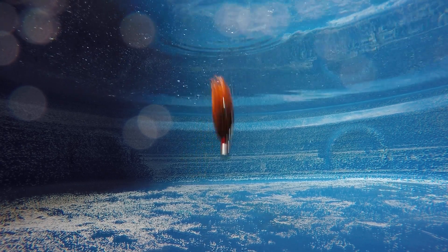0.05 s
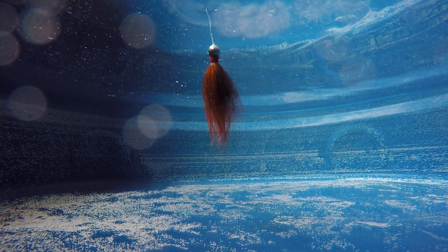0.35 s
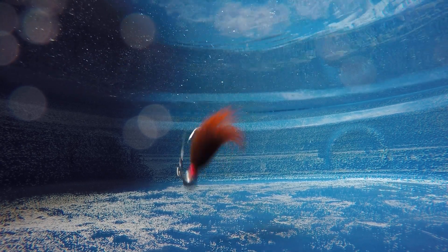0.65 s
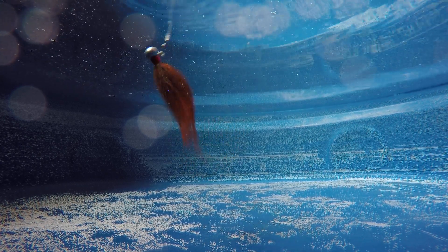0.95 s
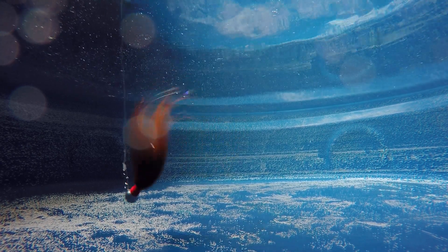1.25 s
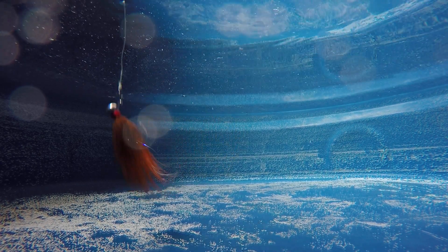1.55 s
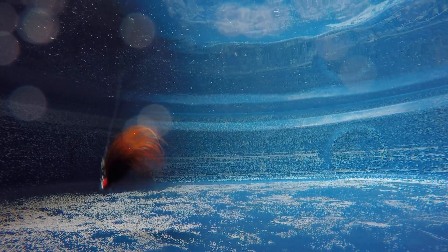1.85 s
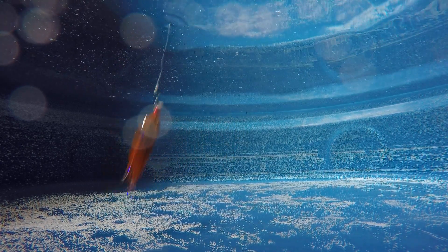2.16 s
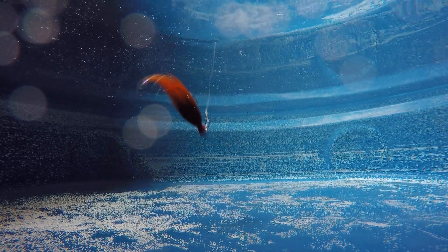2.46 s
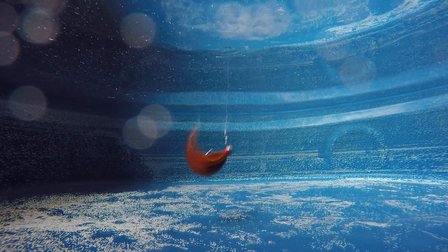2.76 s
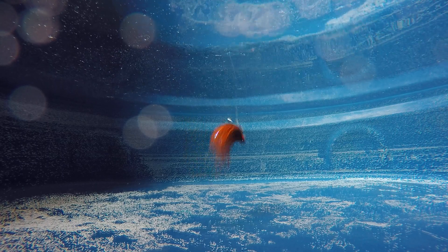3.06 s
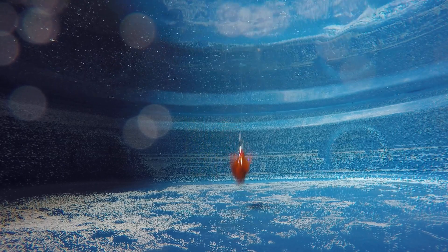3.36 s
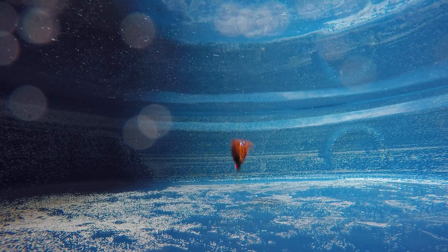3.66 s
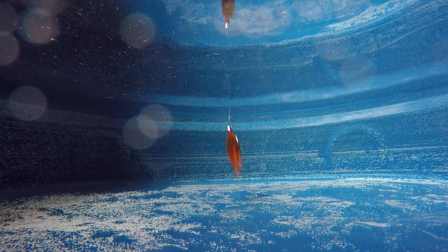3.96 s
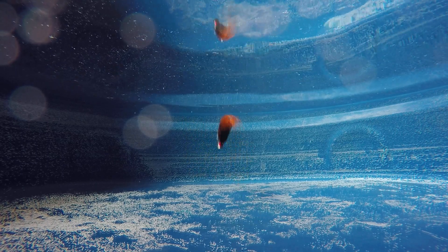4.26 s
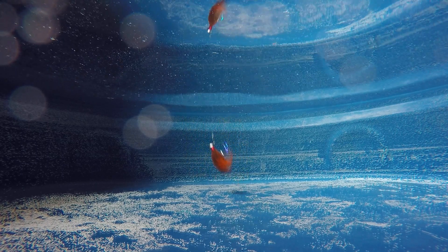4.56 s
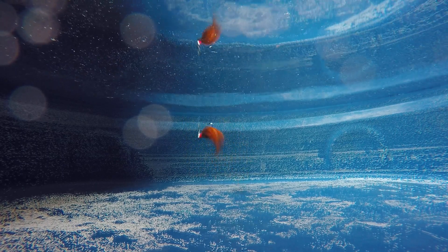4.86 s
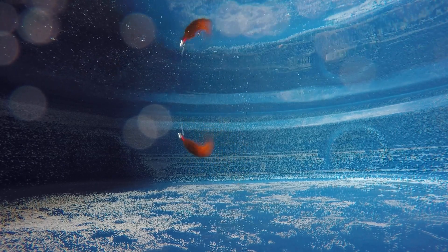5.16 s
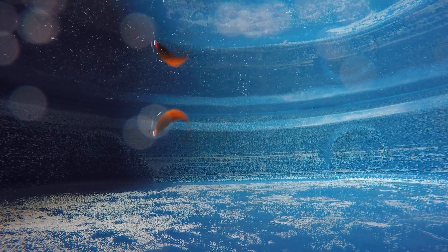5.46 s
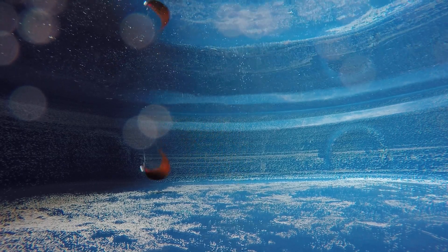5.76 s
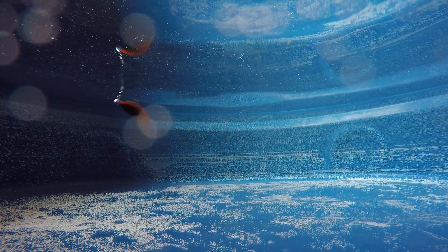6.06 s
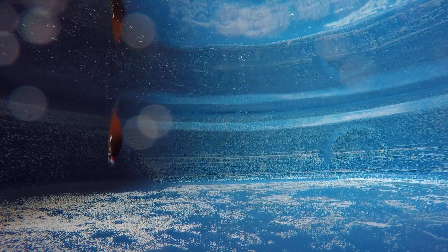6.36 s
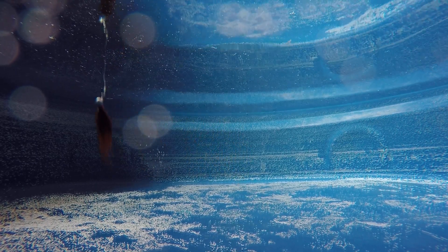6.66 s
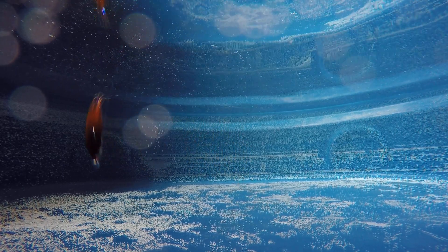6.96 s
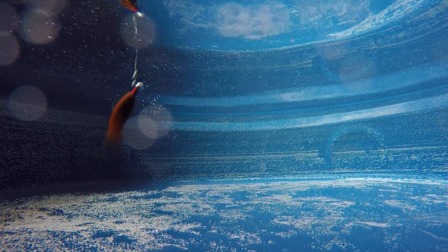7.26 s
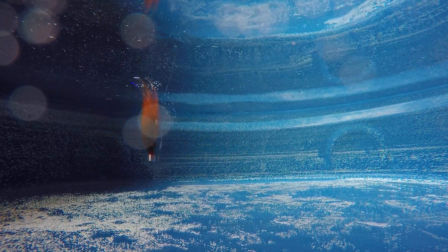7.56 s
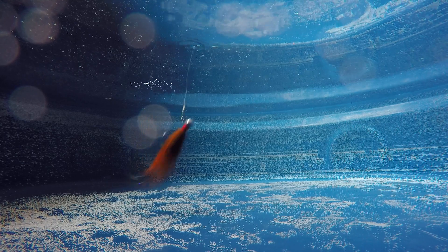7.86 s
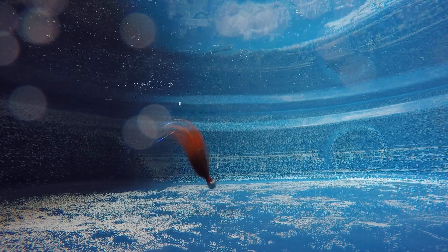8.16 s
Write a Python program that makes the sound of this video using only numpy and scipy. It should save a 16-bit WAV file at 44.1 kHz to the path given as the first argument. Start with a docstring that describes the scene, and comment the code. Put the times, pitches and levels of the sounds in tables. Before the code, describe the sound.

A weighted fishing lure is jigged in a plastic water tank, heard through an underwater camera's case. Its metal head and link give faint, high, irregular ticks. About three seconds in, it hits the floor with a dull knock and a brief low boom, the loudest sound. A small bubble pops just after, and sparse ticking continues to the end over soft hiss, faint motor hum and low water rumble.

```python
"""A weighted fishing lure is jigged in a plastic water tank, heard through an underwater camera's case.
From the start there are microphone hiss, a faint motor hum and a slow rumble of water. At each jerk the
lure's metal head and link tick or scrape, exciting the modes of the case. At 3.3 s the head hits the
floor: dispersive bending waves arrive highs first, then the tank booms and wobbles.
A small bubble pops at 3.9 s, and the ticking goes on to the end."""
import sys
import numpy as np
from scipy import signal
from scipy.fft import rfft, irfft
from scipy.io import wavfile

SR = 44100
rng = np.random.default_rng(int(sys.argv[2]) if len(sys.argv) > 2 else 0)


def to_wav(sig):
    """Store sig (one row per channel, or 1-D mono) as 16-bit WAV at the path in sys.argv[1].

    Samples outside -1..1 are clipped; the rate is SR.
    """
    pcm = np.clip(np.atleast_2d(sig), -1, 1) * 32767
    pcm = np.round(pcm).astype(np.int16)
    wavfile.write(sys.argv[1], SR, pcm.T)  # frames by channels


N = 371322
TIME = np.arange(N) / SR
FREQ = np.maximum(np.fft.rfftfreq(N, 1 / SR), 1)
KNOCK_S = 3.2878


def undb(db):
    """Amplitude ratio of a level in decibels."""
    return 10 ** (np.asarray(db) / 20)


def add(out, start_s, sound):
    """Superposition: a sound adds to the others from its start time."""
    i = int(start_s * SR)
    out[i:i + len(sound)] += sound[:N - i]


def noise(gain):
    """Spectral shaping: white noise is weighted over frequency, then scaled to rms 1."""
    shaped = irfft(rfft(rng.standard_normal(N)) * gain, N)
    return shaped / np.sqrt(np.mean(shaped ** 2) + 1e-30)


def resonance(hz, width_hz):
    """A resonance curve, width_hz wide at half its peak gain."""
    return 1 / (1 + ((FREQ ** 2 - hz ** 2) / (FREQ * width_hz)) ** 2)


def swell_at(middle_s, half_s):
    """A Gaussian envelope, down to 1/e at half_s either side of its peak."""
    return np.exp(-((TIME - middle_s) / half_s) ** 2)


def ring(t, hz, t60):
    """Free vibration of a damped mode, falling 60 dB in t60 seconds."""
    return np.sin(2 * np.pi * hz * t) * np.exp(-np.log(1000) * t / t60)


def mode_responses(t, modes):
    """Impulse responses, one row a mode; neighbouring modes swing in opposite senses."""
    return np.array([(-1) ** k * undb(db) * ring(t, hz, t60) for k, (hz, db, t60) in enumerate(modes)])


def microphone_hiss(hiss_db=-59, whistle_db=-83):
    """Self-noise of the microphone: a steady broad spectrum with a thin high band in it."""
    # spectral shape of the hiss: frequency_hz, gain_db
    spectrum = [(20, -7.5), (45, -5), (75, -10.5), (120, -14), (200, -18), (350, -22.5), (560, -22.5),
                (850, -28), (2000, -30), (5000, -31.5), (8500, -38), (11000, -39), (13000, -38),
                (15000, -40.5)]
    hz, db = np.transpose(spectrum)
    hiss = noise(undb(np.interp(np.log(FREQ), np.log(hz), db)))
    return undb(hiss_db) * hiss + undb(whistle_db) * noise(resonance(hz=9855, width_hz=510))


def low_tones(width_hz=8):
    """Narrow-band noise is heard as pitch: two faint tones swell and fade in turn."""
    # low tones: middle_s, half_length_s, pitch_hz, peak_db
    tones = [(.55, 0.7, 201.7, -69), (2.45, 0.8, 137.1, -67.5)]
    return sum(undb(db) * swell_at(s, half_s) * noise(resonance(hz, width_hz))
               for s, half_s, hz, db in tones)


def motor_hum(waver_db=1.5):
    """Periodic vibration of a small motor gives one drifting note, over low narrow-band drones."""
    # course of the motor's note: time_s, pitch_hz, level_db
    course = [(0, 380.3, -69), (1.3, 382, -68.5), (3.0, 388.2, -73.5), (5.6, 389.8, -82),
              (8.42, 383.4, -75.5)]
    # steady drones: pitch_hz, width_hz, level_db
    drones = [(60.3, 5, -72), (73.3, 6.7, -70), (120, 7.9, -72.5), (280, 9, -80.5)]
    time_s, pitch_hz, level_db = np.transpose(course)
    waver = noise(1 / (1 + (FREQ / 4) ** 4))
    amplitude = np.sqrt(2) * undb(np.interp(TIME, time_s, level_db) + waver_db * waver)
    note = amplitude * np.sin(2 * np.pi * np.cumsum(np.interp(TIME, time_s, pitch_hz)) / SR)
    return note + sum(undb(db) * noise(resonance(hz, width)) for hz, width, db in drones)


def water(stir_db=-53.5, wander_db=0.5, wash_hz=158.6, wash_db=-73.5, swish_db=-60):
    """Forced vibration: moving water rocks the lowest tank mode, and washes softly along the wall."""
    # surges of the water: middle_s, half_length_s, peak_db
    surges = [(1.194, .13, -58), (2.037, 0.085, -54), (2.645, 0.1, -55), (5.168, 0.045, -49)]
    stirring = undb(stir_db + wander_db * noise(1 / (1 + (FREQ / 2) ** 4)))
    surging = sum(undb(db) * swell_at(s, half_s) for s, half_s, db in surges)
    # modulation spreads the wash about 35 Hz to either side
    wash = np.sqrt(2) * noise(1 / (1 + (FREQ / 35) ** 2)) * np.sin(2 * np.pi * wash_hz * TIME)
    swish = swell_at(middle_s=2.59, half_s=0.053) * noise(resonance(hz=180, width_hz=160))
    rumble = (stirring + surging) * noise(resonance(hz=26.5, width_hz=16))
    return rumble + undb(wash_db) * wash + undb(swish_db) * swish


def bubble_pop():
    """A heavily damped oscillation: a bubble bursts in a few cycles."""
    # bursting bubble: start_s, pitch_hz, level_db, t60_s
    bubbles = [(3.909, 2430, -30.5, 0.0026)]
    out, t = np.zeros(N), TIME[:SR // 20]
    for start_s, hz, db, t60 in bubbles:
        onset = 1 - np.exp(-t * hz)
        add(out, start_s, undb(db) * ring(t, hz, t60) * onset)
    return out


def scrape_touches(count=4, level_db=-66.5, pitch_hz=5200):
    """Intermittent contact: each scrape is a few faint touches, given as start_s, level_db, pitch_hz."""
    # the loose link slides along the head: start_s, end_s
    scrapes = [(.205, 0.29), (.735, .815), (5.16, 5.18), (5.815, 5.865)]
    touches = []
    for start_s, end_s in scrapes:
        for k, (when, size, pitch) in enumerate(rng.uniform(-1.2, 1, (count, 3))):
            touch_s = start_s + (end_s - start_s) * (k + (1 + when) / 2) / count
            touches.append((touch_s, level_db + 3 * size, pitch_hz * 2 ** (.2 * pitch)))
    return touches


def lure_ticks(chatter_s=0.0027, rustle_s=0.014, scatter_db=1.0, fall_db_per_octave=31, edge_hz=3500):
    """Impact excitation: each metal contact rings the case, most strongly in modes near its pitch."""
    # contacts of head and link, higher in pitch when harder: start_s, level_db, pitch_hz
    ticks = [(0.2608, -48.5, 5500), (0.4302, -59.5, 4600), (0.438, -59, 4890), (0.554, -57.5, 4770),
             (0.715, -54, 3900), (0.7205, -51, 4360), (0.817, -47, 5400), (1.1195, -69, 5800),
             (1.1915, -60.5, 5200), (1.296, -64.5, 5400), (1.44, -60, 6000), (2.106, -52.5, 5650),
             (2.791, -67, 5860), (3.254, -59.5, 4360), (3.2874, -33, 3840), (3.382, -48.5, 5180),
             (3.903, -53, 5070), (4.568, -58.5, 5340), (5.184, -48, 5140), (5.8328, -50.5, 5280),
             (6.562, -45, 4780), (6.6034, -64, 4400), (7.158, -45.5, 4550), (7.1768, -61, 4500),
             (7.603, -62, 4400), (7.8115, -53.5, 5530), (8.334, -59.5, 5650)]
    # modes of the camera case: frequency_hz, gain_db, t60_s
    case_modes = [(3790, -0.5, 0.014), (3900, -5, 0.013), (4116, -4, 0.02198), (4270, 1.5, 0.011),
                  (4487, -3.5, 0.033), (4597, -8, .014), (5255, -4, 0.034), (5515, -3, .05),
                  (5706, 1, 0.0562), (6060, -8, .045), (6120, -4.5, .04), (6534, -2, .035), (6580, 0, .035),
                  (6630, -1.5, 0.06), (7030, -3, 0.064), (7530, -1, .035), (7650, -1.5, .055),
                  (8010, -8, 0.037), (8300, -4.5, 0.055), (8420, -10, .045), (8985, -11, .03),
                  (11690, -16, .045), (12770, -12.5, .035)]
    # groups of modes that a contact drives together: frequency_hz, gain_db
    groups = [(3840, -3), (4360, 0), (5750, 0), (7400, 4.5)]
    # boundaries between the groups: frequency_hz
    splits = [4000, 5000, 6400]
    out, t = np.zeros(N), TIME[:int(.12 * SR)]
    attack_samples = int(.012 * SR)
    group_of_mode = np.searchsorted(splits, [hz for hz, _, _ in case_modes])
    responses = mode_responses(t, case_modes)
    chatter = 0.18 * np.exp(-t / chatter_s) + 0.028 * np.exp(-t / rustle_s)
    for start_s, level_db, pitch_hz in ticks + scrape_touches():
        force = rng.standard_normal(len(t)) * chatter
        force[0] += 2  # the opening click
        coupling = undb(scatter_db * rng.standard_normal((len(case_modes), 1)))
        ringing = signal.fftconvolve(responses * coupling, force[None], axes=1)[:, :len(t)]
        for k, (group_hz, group_db) in enumerate(groups):
            attack_db = level_db + group_db - fall_db_per_octave * abs(np.log2(group_hz / pitch_hz))
            band = ringing[group_of_mode == k].sum(0)
            add(out, start_s, undb(attack_db) * band / np.std(band[:attack_samples]))
    # the stiff case passes little below its first mode
    return signal.sosfilt(signal.butter(8, edge_hz, "high", fs=SR, output="sos"), out)


def floor_crack(level_db=-47, decay_s=.006, corner_hz=2500):
    """A brief impact has a broad spectrum: the snap of the head meeting the floor."""
    out, t = np.zeros(N), TIME[:SR // 10]
    snap = noise(1 / np.sqrt(1 + (FREQ / corner_hz) ** 2))[:len(t)]
    add(out, KNOCK_S, undb(level_db) * np.exp(-t / decay_s) * snap)
    return out


def wall_shudder(centre_hz=300, centre_db=-29.5, centre_t60_s=0.21, centre_rise_s=0.011):
    """Modal density: the knock shakes a crowd of weak wall modes, which thicken the thud."""
    out, t = np.zeros(N), TIME[:SR]
    for band_hz in 75 * 2 ** np.arange(0, 5.1, .5):
        octaves = np.log2(band_hz / centre_hz)
        stretch = 2 ** (-0.72 * octaves)  # lower modes rise later and last longer
        modes_hz = band_hz * 2 ** (rng.uniform(-.5, 0.46, size=6) / 2)
        crowd = sum(rng.choice([-1, 1]) * ring(t, hz, centre_t60_s * stretch) for hz in modes_hz)
        rise = 1 - np.exp(-(t / (centre_rise_s * stretch)) ** 2)
        add(out, KNOCK_S, undb(centre_db - 10.5 * abs(octaves)) * rise * crowd)
    return out


def floor_knock(gain_db=-15.5, front_hz=1171, contact_hz=2050, swell_s=0.026, swell_hz=34):
    """Dispersion: the struck tank's ring travels as bending waves by several paths, highs first."""
    # modes of the water-loaded tank: frequency_hz, gain_db, t60_s
    tank_modes = [(28.44, -11, 1.22), (34.6, -12, 0.66), (56.6, -4, 0.45), (71.9, -8.5, 0.5),
                  (83.3, -9.5, 0.38), (99.5, -9.5, 0.21), (129.7, -3.5, .3), (161, -8, 0.28),
                  (192.7, -1.5, .22), (237, -15.5, .13), (277, 1, .16), (333.7, -12, 0.11), (382, -12, .08),
                  (493.4, 0, 0.087), (564.4, -3, 0.077), (680, -7, .07), (738, -10, 0.064),
                  (816, -13, 0.069), (1050, -14.5, .042), (1167, -23, .04), (1256, -15, 0.0253),
                  (1530, -19, 0.03), (1835, -22, 0.035), (2150, -36.5, 0.018)]
    # paths from the floor to the camera: lag_s, slow_wave_extra_s, gain_db
    paths = [(0.0014, 0.00012, -9), (0.0053, 0.00241, -8.5), (0.0011, 0.0085, 2.5), (0.0046, 0.0141, -9)]
    boom = np.zeros(N)
    add(boom, KNOCK_S, mode_responses(TIME[:2 * SR], tank_modes).sum(0))
    slowness = 1 / (1 + (FREQ / front_hz) ** 3)  # lower bending waves travel more slowly
    wobble_delay_s = swell_s / (1 + (FREQ / swell_hz) ** 2)  # the deepest wobble swells last
    transfer = 0
    for lag_s, extra_s, path_db in paths:
        group_delay_s = lag_s + extra_s * slowness + wobble_delay_s
        transfer += undb(path_db) * np.exp(-2j * np.pi * np.cumsum(group_delay_s) * SR / N)
    soft_contact = 1 / np.sqrt(1 + (FREQ / contact_hz) ** 12)
    return undb(gain_db) * irfft(rfft(boom) * soft_contact * transfer, N)


def scene():
    """Superposition: all sources add at one microphone inside the case."""
    lure = lure_ticks() + floor_knock() + wall_shudder() + floor_crack()
    return (lure + bubble_pop() + motor_hum() + low_tones() + water() + microphone_hiss())[None]


def record(dry):
    """Band limiting: the camera cuts the treble steeply above 15.3 kHz."""
    return signal.sosfilt(signal.ellip(10, .2, 70, 15300, fs=SR, output="sos"), dry)


dry = scene()
out = record(dry)
to_wav(out)
```